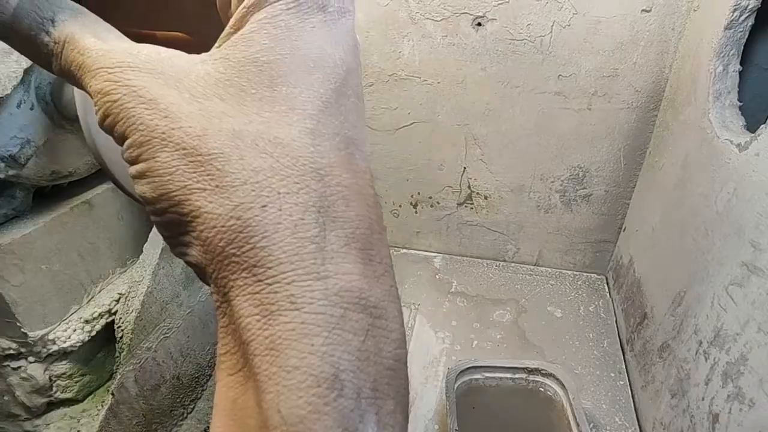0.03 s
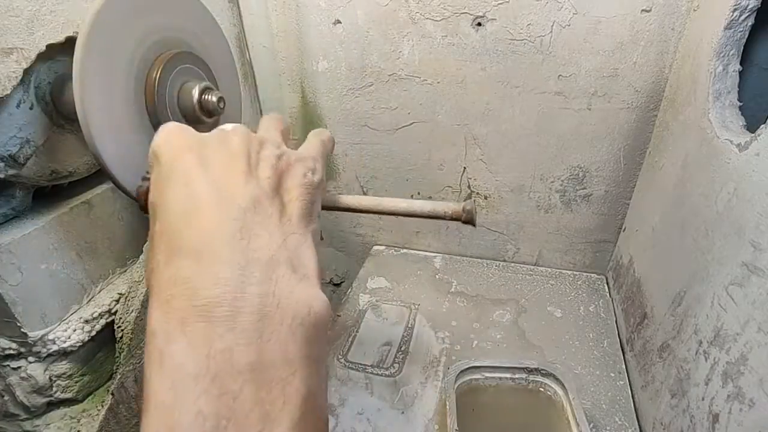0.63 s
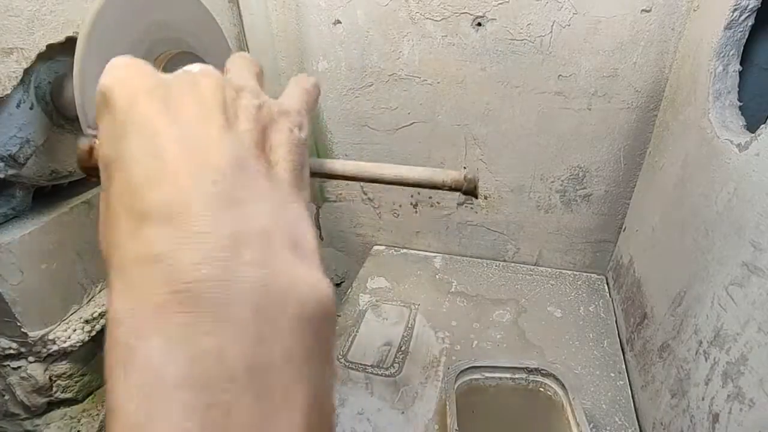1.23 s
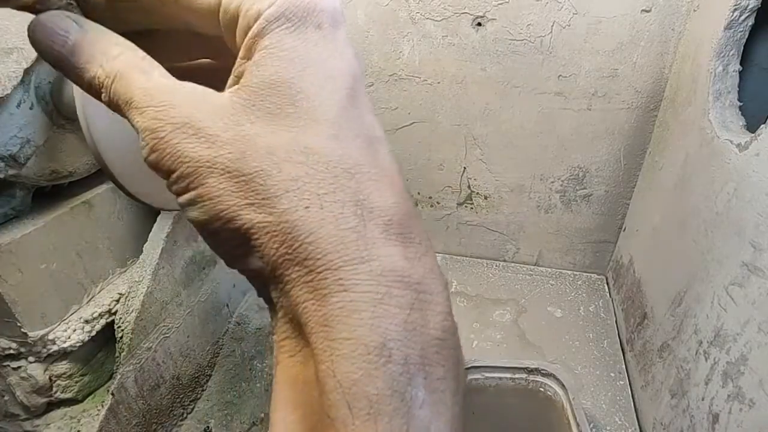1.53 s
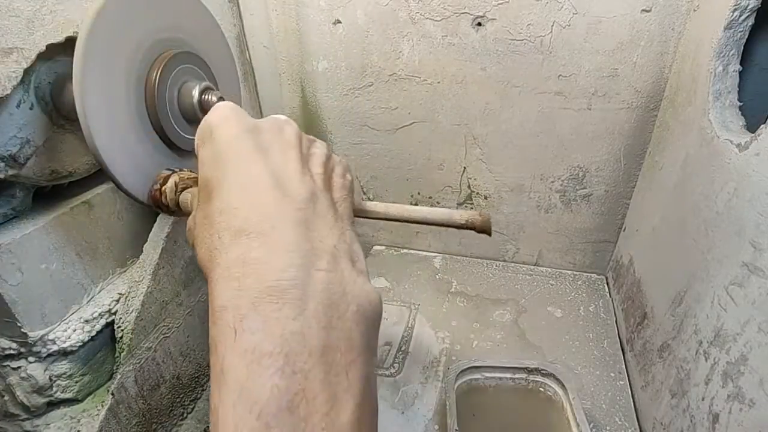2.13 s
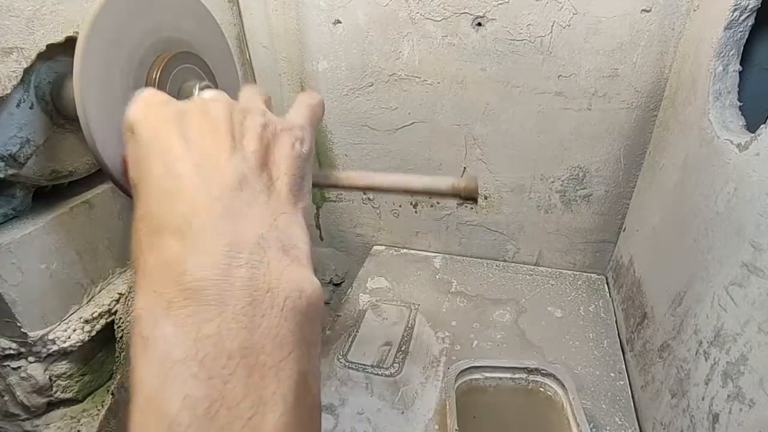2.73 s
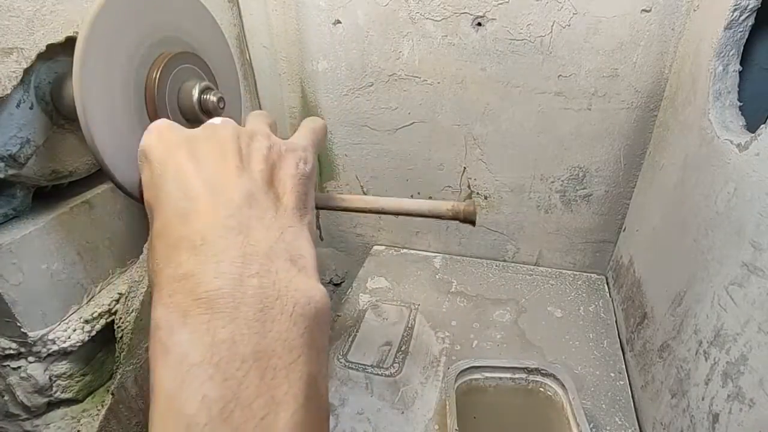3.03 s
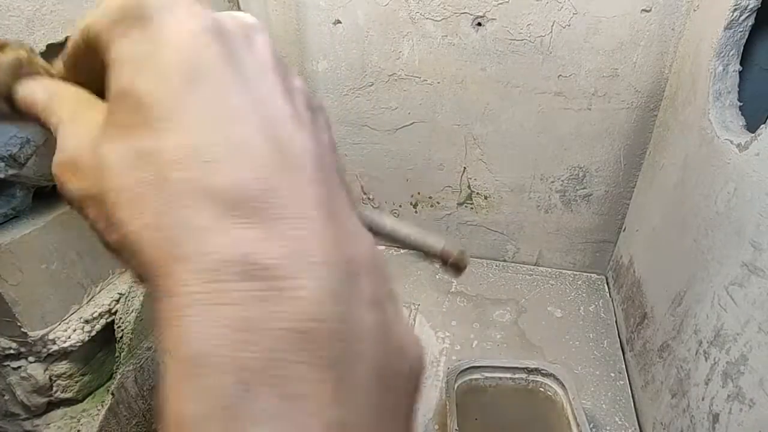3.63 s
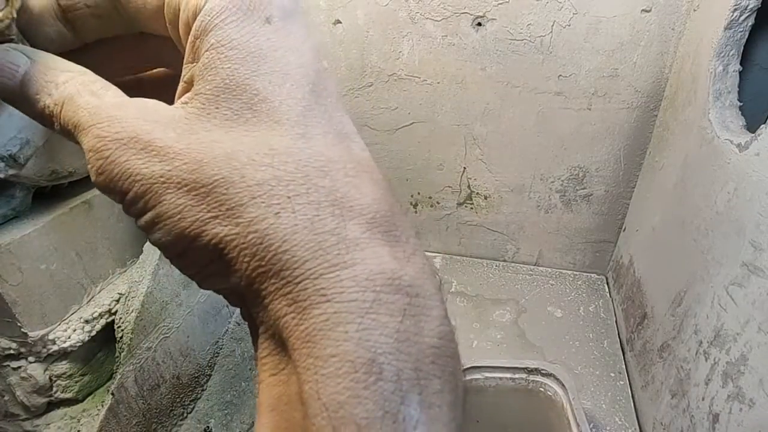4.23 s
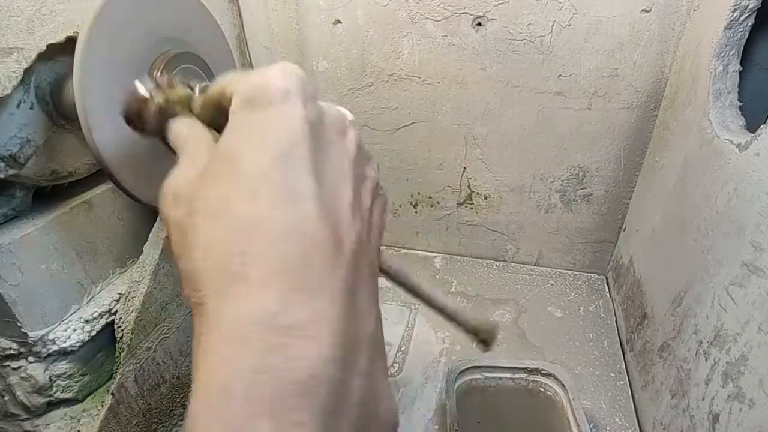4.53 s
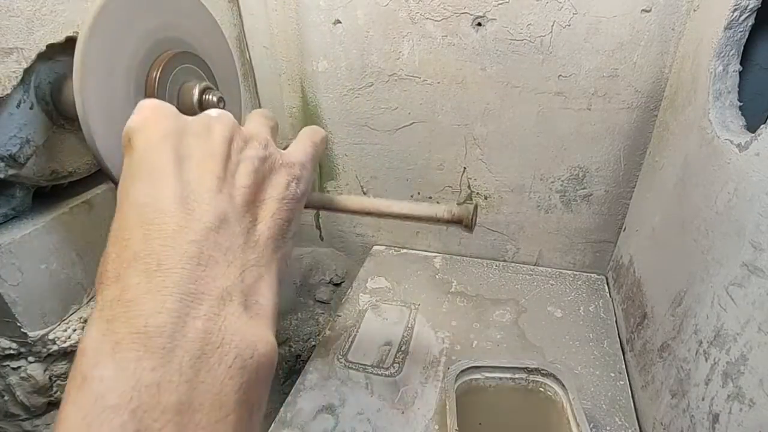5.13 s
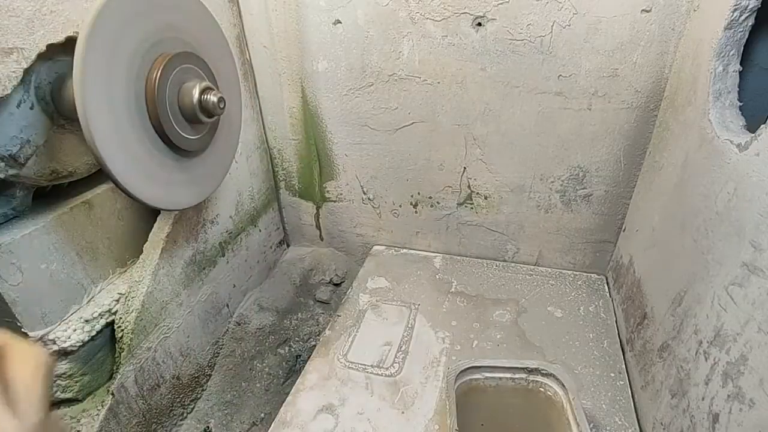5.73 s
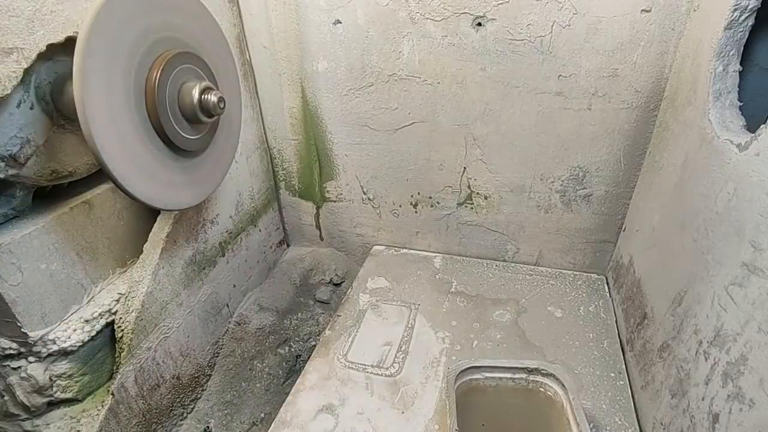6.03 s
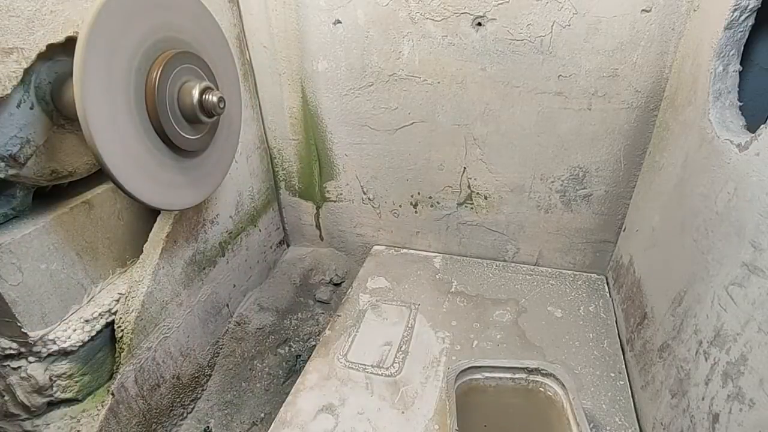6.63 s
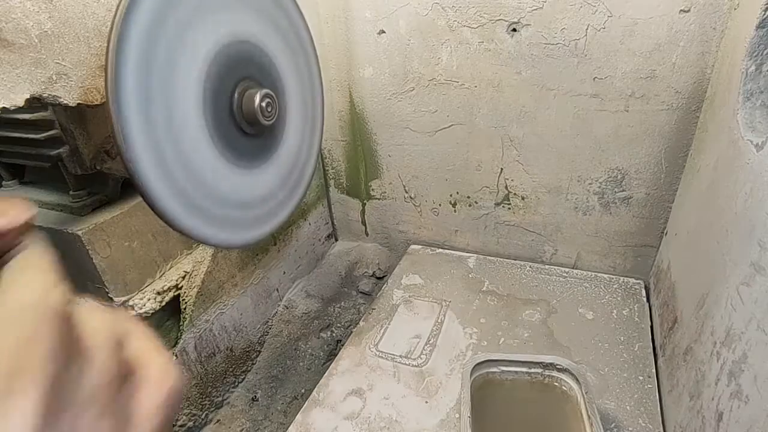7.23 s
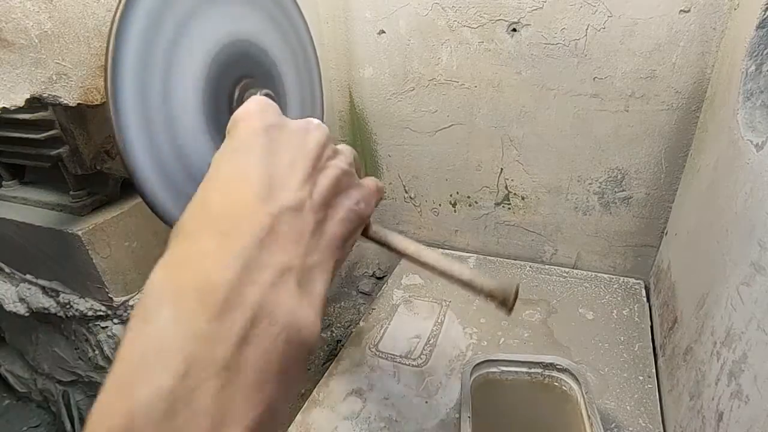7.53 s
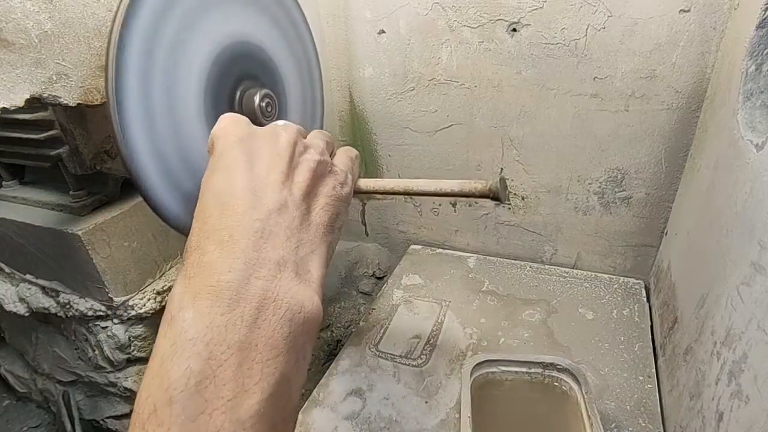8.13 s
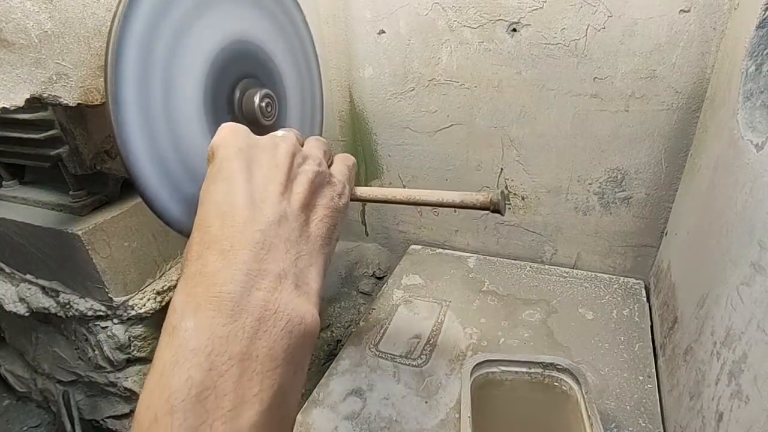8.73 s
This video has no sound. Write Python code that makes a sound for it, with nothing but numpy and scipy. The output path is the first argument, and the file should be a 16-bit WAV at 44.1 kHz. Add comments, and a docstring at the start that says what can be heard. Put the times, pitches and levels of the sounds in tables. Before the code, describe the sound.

A stone grinds with a loud, ringing hiss against a spinning wheel over a steady motor hum, then rasps more gently on a second wheel.

```python
"""A stone on a holding stick is ground against a motor-driven wheel in a splash hood, heard close by.
First the motor hums and shakes its frame. At 0.8, 2.5 and 5.1 s the stone is pressed on firmly: grit
chips it with a hiss, stone and wheel ring, and a limiter turns the hum down under each press.
Near 7 s the sound breaks off, then fades back in with a second, smoother wheel and a swell of rumble.
At 8 s the stone is eased onto this wheel and grinds with a rough drone for about a second."""
import sys
import numpy as np
from scipy import signal
from scipy.fft import rfft, irfft, next_fast_len
from scipy.io import wavfile
from scipy.ndimage import uniform_filter1d

SR = 44100
rng = np.random.default_rng(int(sys.argv[2]) if len(sys.argv) > 2 else 0)


def bounce(signal):
    """Save signal as a 16-bit WAV file at the path given by the first command-line argument."""
    frames = np.transpose(np.atleast_2d(signal))
    limited = np.clip(frames, -1, 1)
    pcm = np.round(limited * 32767).astype(np.int16)
    wavfile.write(sys.argv[1], SR, pcm)


N = 395577
TIME = np.arange(N) / SR
TURN_HZ = 49.73   # turns of the shaft per second
BREAK_S, RESUME_S = 6.941, 6.971   # the short gap for the change of wheel


# firm presses: touch t/s, held for t/s, relative level/dB, hand there early by t/s, starts softer by/dB
PRESSES = [(.790, 0.653, -9, .9, 5.5), (2.469, 1.2485, -9.5, 0.57, 7), (5.062, 0.405, -10.5, 0.85, 3.5)]
# hiss of stone chipping on the first wheel: f/Hz, relative level/dB
FIRST_HISS = [(600, -27), (1000, -11), (1250, -8.5), (2050, -6), (2600, -11.5), (3350, -5), (3900, -1.5),
              (4600, -2), (5500, -3.5), (6200, -7.5), (6600, -1), (8000, -2), (8800, -2), (9350, -13),
              (9900, -3), (10800, -7), (11800, -4.5), (12400, -4.5), (14500, -19), (15600, -8)]
# notes the first wheel rings at: f/Hz, width/Hz, relative level/dB
FIRST_NOTES = [(1160, 57, -6), (1305, 98, -4), (2820, 38, 3), (2890, 38, 10), (3390, 60, -0.5),
               (4470, 61, 2), (4670, 74, 1), (5350, 67, 3.5), (6630, 93, 3), (7050, 36, 7), (7280, 160, 6),
               (7580, 130, 7), (10900, 65, -12), (11270, 68, 9), (11310, 50, 9), (11560, 41, 10.5),
               (11616, 62, 9.5), (15020, 43, 2.5), (15000, 70, -10), (15410, 80, -1)]

def first_wheel_grinding(angle):
    """Three firm presses make the stone hiss and screech and the first wheel ring."""
    press = pressure(PRESSES, settle_s=0.078, lift_s=0.036)
    return grind(angle, press, FIRST_HISS, FIRST_NOTES, buzz=0.11, screech_share=0.64,
                 wobble_db=-0.4, ripple_db=0.8, chatter_db=1.0, wander=0.0014, uneven_db=1.5)


# hiss of stone chipping on the second wheel: f/Hz, relative level/dB
SECOND_HISS = [(350, -35), (700, -5.5), (950, -3.5), (1300, 4), (1580, 1), (1800, -11), (2450, -10),
               (3000, -8), (3500, -1.5), (5200, -3.5), (6800, 1), (7150, -9), (8000, 5), (8900, 5.5),
               (10500, -3.5), (11200, 6), (12100, 6), (12900, 0), (14400, -1), (16000, -6)]
# notes the second wheel rings at: f/Hz, width/Hz, relative level/dB
SECOND_NOTES = [(1070, 45, 5), (1340, 29, -1), (1550, 52, 4), (3510, 62, -1), (4700, 90, -2),
                (6770, 160, 2), (8140, 111, 1), (8440, 110, 4), (8920, 120, 3), (9860, 110, 5),
                (11100, 90, 1), (11800, 150, 8)]

def second_wheel_grinding(angle, press):
    """On the smoother wheel the stone buzzes more and screeches less."""
    return grind(angle, press, SECOND_HISS, SECOND_NOTES, buzz=1.23, screech_share=0.41,
                 wobble_db=-1.1, ripple_db=-0.8, chatter_db=0.5, wander=0.0015, uneven_db=2.5)


# gentle touches: touch t/s, held for t/s, relative level/dB, starts softer by/dB
GENTLE_TOUCHES = [(7.998, 0.017, -15.5, 11.5), (8.05, 0.902, -18, 6)]

def gentle_pressure():
    """The stone brushes the second wheel, then leans in slowly and skips off."""
    return pressure(GENTLE_TOUCHES, settle_s=0.14, lift_s=0.023)


def pressure(touches, settle_s, lift_s):
    """How hard the stone pushes: each touch bites below full strength, settles, holds and lifts off."""
    total = 1e-6
    for touch, held, db, *_, softer_db in touches:
        since = np.maximum(TIME - touch, 0)
        strength = from_db(db - softer_db * np.exp(-since / settle_s))
        release = np.exp(-(np.maximum(since - held, 0) / lift_s) ** 2)
        total = total + (since > 0) * strength * release
    return total


def grind(angle, press, hiss, notes, buzz, screech_share, wobble_db, ripple_db, chatter_db,
          wander, uneven_db):
    """Tiny blows of grit hiss, make the stone screech and set the wheel ringing."""
    blows = grit_blows(angle, buzz)
    # the rim wobbles once a turn and is worn into six ripples
    rim_db = wobble_db * np.sin(angle) + ripple_db * np.sin(6 * angle)
    force = press * from_db(rim_db + chatter_db * drift(110))
    touching = press > 1e-4
    ringing = wheel_ringing(blows, touching, notes, wander, uneven_db)
    scrape = np.sqrt(1 - screech_share) * blows + np.sqrt(screech_share) * stone_screech(touching)
    rasp = hood_echoes(colour(scrape, hiss), strength=1.6, fade_ms=4.5, wander_rate=12)
    sound = force * (rasp + ringing)
    return sound * rms(force * blows) / rms(sound)


def grit_blows(angle, buzz, grains=887):
    """Fresh chipping is random, while the same grains coming round on every turn give a buzz."""
    chipping = stereo_noise()
    grain_at_stone = (angle / (2 * np.pi) * grains).astype(int) % grains
    repeating = rng.standard_normal(grains)[grain_at_stone]
    grit = (chipping + buzz * repeating) / np.sqrt(1 + buzz ** 2)
    blow_db = 3 * rng.standard_normal(N // 16 + 1).repeat(16)[:N]   # a new strength every 16 samples
    return grit * from_db(blow_db)


def stone_screech(touching, life_s=0.07, width_hz=18, range_db=6):
    """The rolling stone rings in short notes, each with a new pitch, strength and left-right place."""
    band_starts_hz, band_hz = np.linspace(1500, 15200, 36, retstep=True)
    times, rings = TIME[touching], 0
    for low_hz in band_starts_hz:
        age = times / life_s + rng.random()   # each whole number starts a new note
        pitch, size, place = rng.random((3, 512))[:, age.astype(int) % 512]
        jitter = np.sqrt(2 * np.pi * width_hz / SR) * rng.standard_normal(len(times))
        phase = np.cumsum(2 * np.pi * (low_hz + band_hz * pitch) / SR + jitter) % (2 * np.pi)
        pair = np.sin(np.array([phase, phase + 2 * np.pi * place], np.float32))
        rings = rings + from_db(range_db * size) * np.sin(np.pi * age) * pair
    out = np.zeros((2, N))
    out[:, touching] = rings / rms(rings)
    return out


def wheel_ringing(blows, touching, notes, wander, uneven_db):
    """Rubbing keeps the wheel singing; the moving contact shifts each note's pitch, level and place."""
    times, feed, total = TIME[touching], blows[0, touching], 0
    for hz, width, db in notes:
        pitch_hz = hz * (1 + wander * drift(14, times))
        phase = (2 * np.pi * (np.cumsum(pitch_hz) / SR % 1)).astype(np.float32)
        wave = np.array([np.cos(phase), np.sin(phase)])
        # smoothing twice keeps only the part of the blows that is close to this pitch
        keep = np.exp(-np.pi * width / np.sqrt(np.sqrt(2) - 1) / SR)
        swing = signal.lfilter([(1 - keep) ** 2], [1, -2 * keep, keep * keep], feed * wave)
        swing = hold_steady(swing, power=(swing ** 2).sum(axis=0))
        right_phase = phase + (2.1 * drift(22, times)).astype(np.float32)
        left = (swing * wave).sum(axis=0)
        right = swing[0] * np.cos(right_phase) + swing[1] * np.sin(right_phase)
        gain = np.sqrt(2 * np.pi * width / SR) * from_db(db + uneven_db * drift(18, times))
        total = total + gain * np.array([left, right])
    bass_cut = signal.butter(2, 600, "high", fs=SR, output="sos")
    out = np.zeros((2, N))
    out[:, touching] = signal.sosfilt(bass_cut, total)
    return out


# notes of the first wheel as it bends: f/Hz, width/Hz, relative level/dB
BENDING_NOTES = [(1471, 4, 22.5), (1516, 5.1, 17.5), (1320, 68, -15)]
# how they swell and ebb, one list for each press: t/s, relative level/dB
BENDING_SWELLS = [
    [(0.79, -47), (0.97, -25), (1.028, -40), (1.126, -37), (1.172, -24.5), (1.272, -44), (1.29, -33),
     (1.452, -32.5), (1.62, -63.5)],
    [(2.47, -57), (2.586, -31), (2.732, -29), (2.808, -39), (2.906, -29), (3.196, -34), (3.276, -42),
     (3.766, -28), (3.92, -64)],
    [(5.06, -58), (5.198, -39), (5.222, -27), (5.458, -36), (5.502, -29), (5.57, -45), (5.598, -53),
     (5.646, -54), (5.66, -57)],
]

def wheel_bending(on_second):
    """The first wheel sings softly when free; under the stone, rubbing steadies it and it swells."""
    idle = from_db(-47.5 + 4.5 * hand_near()) * ~on_second
    rubbed = 0
    for swell in BENDING_SWELLS:
        swell_db = np.interp(TIME, *np.transpose(swell), left=-np.inf, right=-np.inf)
        rubbed = rubbed + from_db(9.5 + swell_db)
    ring = resonate(stereo_noise(), BENDING_NOTES)
    steady = hold_steady(ring, power=np.mean(ring ** 2, axis=0))
    return idle * ring / rms(ring) + rubbed * steady


# tones of the second wheel under the stone: multiple of the turning rate, relative level/dB
DRONE_TONES = [(21, -4), (22, -4), (24, 2), (25, 1), (27, -4), (30, 6), (31, 2), (32, 6)]

def wheel_drone(angle, press):
    """The second wheel drones roughly, louder the harder the stone pushes."""
    return from_db(-24) * press * shaft_tones(angle, DRONE_TONES, waver_db=2, waver_rate=20)


# tones of the motor: multiple of the turning rate, relative level/dB
HUM_TONES = [(2, -7), (3, -9.5), (4, -34), (6, -10.5), (8, -17.5), (10, -19.5), (12, 0.5), (14, -18.5),
             (16, -24), (18, -10.5)]

def motor_hum(angle, left_lag_ms=0.041):
    """The motor hums in step with its shaft; it stands to one side, so the left hears it later."""
    lag_angle = 2 * np.pi * TURN_HZ * left_lag_ms / 1000
    angles = np.array([angle - lag_angle, angle])
    return from_db(-28.5) * shaft_tones(angles, HUM_TONES, waver_db=0.9, waver_rate=13)


def motor_sag(on_second, drop_db=1):
    """A gain that makes the motor a little softer from the last firm press until the wheel change."""
    touch, held, *_ = PRESSES[-1]
    return from_db(-drop_db * ramp(touch + held, length_s=0.88) * ~on_second)


# low notes of the frame: f/Hz, width/Hz, relative level/dB
FRAME_NOTES = [(103, 11, -28), (139, 15, 5), (158.3, 13.4, 5), (298.4, 28.4, 5)]

def frame_rumble():
    """The motor shakes its frame, which rumbles at a few low notes."""
    shaking = resonate(stereo_noise(), FRAME_NOTES)
    return at_level(colour(shaking, [(50, -20), (90, -0.5), (330, -2.5), (700, -21)]), db=-31.5)


# noise of air and bearings: f/Hz, relative level/dB
AIR_NOISE = [(30, -10), (65, -7), (110, -23), (230, 4.5), (350, 4.5), (500, 2), (720, 6), (950, -2.5),
             (1400, 0.5), (1800, -16), (2600, -13), (6000, -63)]

def air_rush():
    """Stirred air and turning bearings make a steady rush."""
    return at_level(colour(stereo_noise(), AIR_NOISE), db=-33)


# swish of each wheel's rim: f/Hz, relative level/dB
FIRST_SWISH = [(900, -20), (1300, 1), (1750, -2.5), (2400, -0.5), (2950, 3.5), (3800, -3.5), (4450, -3.5),
               (5200, -10), (7700, -8), (8600, -2), (9700, -13.5), (11200, -14), (11700, -2.5),
               (12400, -15.5), (16000, -18)]
SECOND_SWISH = [(900, -17), (1200, 6), (1550, 9.5), (1750, -1), (2450, -4.5), (2700, 0.5), (3450, 4),
                (3900, -5.5), (4700, -4), (5050, -9), (6800, -3.5), (7200, -16), (8200, -1.5), (9100, -6),
                (9700, -13), (11100, -10), (11700, -4), (12600, -9), (16000, -20)]

def rim_swish(angle, on_second, left_lag_ms=0.24):
    """Each rim swishes and throbs a little on every turn; the first is louder with the hand near."""
    left, right = stereo_noise()
    late_left = np.interp(TIME - left_lag_ms / 1000, TIME, left)   # the rim lies off to one side
    rim = hood_echoes(np.array([late_left, right]), strength=0.7, fade_ms=7, wander_rate=14)
    throb_db = 0.41 * np.sin(angle)
    first = at_level(colour(rim, FIRST_SWISH), db=-35.5 + 2 * hand_near() + throb_db)
    second = at_level(colour(rim, SECOND_SWISH), db=-31 + throb_db)
    return np.where(on_second, second, first)


def whine(angle, step_s=5):
    """A thin whine at twenty times the turning rate steps up in level about halfway through."""
    tone = shaft_tones(angle, [(20, 0)], waver_db=1, waver_rate=23)
    return at_level(tone, db=np.where(TIME < step_s, -51, -43.5))


# the hollow note heard with the second wheel: f/Hz, width/Hz, relative level/dB
HOWL_NOTE = [(707, 28, 0)]

def howl(on_second):
    """A soft, hollow howl comes with the second wheel."""
    return on_second * at_level(resonate(rng.standard_normal(N), HOWL_NOTE), db=-45)


# deep rumble of the stand: f/Hz, relative level/dB
STAND_RUMBLE = [(20, -29), (52, -30), (76, 1), (92, -1), (125, -3), (300, -36)]

def stand_rumble(swell_at_s=7.3, swell_width_s=0.31):
    """The stand rumbles faintly and swells once after the change of wheel."""
    deep = colour(rng.standard_normal(N), STAND_RUMBLE)
    swell = np.exp(-((TIME - swell_at_s) / swell_width_s) ** 2)
    return at_level(deep, db=-54) + swell * at_level(deep, db=-37)


def hood_echoes(x, strength, fade_ms, wander_rate):
    """Echoes off the close hood boost some pitches and weaken others, shifting as the hand moves."""
    ms = np.arange(2048) * 1000 / SR
    weights = np.array([drift(wander_rate) for _ in range(3)])
    out = x
    for weight in weights / np.linalg.norm(weights, axis=0):
        walls = rfft(rng.standard_normal((2, len(ms))) * np.exp(-ms / fade_ms))
        walls /= np.sqrt(uniform_filter1d(np.abs(walls) ** 2, size=17))   # keep only fine ripples
        echoes = irfft(walls)[:, :len(ms) // 2]
        out = out + strength * weight * signal.oaconvolve(x, echoes, axes=1)[:, :N]
    return out * rms(x) / rms(out)


# how alike left and right are: f/Hz, likeness from 0 to 1
LIKENESS = [(25, .85), (80, 1), (150, 1), (350, 0.79), (900, 0), (1800, 0.93), (8000, 0.37)]

def stereo_noise():
    """White noise for two ears: alike in the bass, scattered by the hood in the treble."""
    shared, apart = rng.standard_normal((2, N))
    mid = shape(shared, lambda hz: np.sqrt(1 + at_hz(LIKENESS, hz)))
    side = shape(apart, lambda hz: np.sqrt(1 - at_hz(LIKENESS, hz)))
    return np.array([mid + side, mid - side]) / np.sqrt(2)


def hand_near(move_s=0.13):
    """Goes from 0 to 1 as the hand comes up for a firm press, and back as it lifts."""
    return sum(ramp(touch - early, move_s) - ramp(touch + held, move_s)
               for touch, held, _, early, _ in PRESSES)


def shaft_tones(angle, tones, waver_db, waver_rate):
    """Tones locked to the turning shaft, each wavering in level on its own."""
    total = 0
    for multiple, db in tones:
        gain = np.sqrt(2) * from_db(db + waver_db * drift(waver_rate))
        total = total + gain * np.sin(multiple * angle + rng.uniform(0, 2 * np.pi))
    return total


def hold_steady(x, power, window_s=0.031):
    """Even out a ringing note's level, as steady rubbing does."""
    return x / np.sqrt(uniform_filter1d(power, int(window_s * SR)) + 1e-12)


def resonate(x, notes):
    """Let a sound ring at each note of (f/Hz, width/Hz, level/dB)."""
    out = 0
    for hz, width, db in notes:
        keep = np.exp(-np.pi * width / SR)
        feedback = [1, -2 * keep * np.cos(2 * np.pi * hz / SR), keep * keep]
        gain = (1 - keep * keep) / 2
        out = out + from_db(db) * signal.lfilter([gain, 0, -gain], feedback, x)
    return out


def colour(x, spectrum):
    """Make pitches louder or softer by a table of (f/Hz, level/dB)."""
    return shape(x, lambda hz: from_db(at_hz(spectrum, hz)))


def shape(x, gain_at):
    """Multiply each frequency in a sound by gain_at(hz)."""
    size = next_fast_len(N + SR // 20)
    hz = np.maximum(np.arange(size // 2 + 1) * SR / size, 1)
    return irfft(rfft(x, size) * gain_at(hz), size)[..., :N]


def at_hz(points, hz):
    """Read between rows of (f/Hz, value), giving every octave equal room."""
    frequencies, values = np.transpose(points)
    return np.interp(np.log(hz), np.log(frequencies), values)


def drift(rate, times=TIME):
    """A random wander of typical size 1 that changes course `rate` times a second."""
    points = rng.standard_normal(4000)
    return np.interp(times * rate, np.arange(len(points)), points) * np.sqrt(3 / 2)


def ramp(start_s, length_s):
    """Rise evenly from 0 to 1."""
    return np.clip((TIME - start_s) / length_s, 0, 1)


def at_level(x, db):
    """Bring a steady sound to an average level."""
    return from_db(db) * x / rms(x)


def rms(x):
    """The average size of a signal (root mean square)."""
    return np.sqrt(np.mean(x ** 2) + 1e-20)


def from_db(db):
    """Turn decibels into a gain to multiply by."""
    return 10 ** (np.asarray(db) / 20)


def scene():
    """The shaft turns almost evenly and sets the pace; the stone grinds over the running machine."""
    angle = 2 * np.pi * np.cumsum(TURN_HZ * (1 + 0.00088 * drift(5))) / SR
    on_second = TIME > BREAK_S   # true once the second wheel is on
    eased = gentle_pressure()
    grinding = from_db(2) * (first_wheel_grinding(angle) + second_wheel_grinding(angle, eased))
    drone = wheel_drone(angle, eased)
    hum, thin_whine = motor_hum(angle), whine(angle)
    frame, stand = frame_rumble(), stand_rumble()
    motor = motor_sag(on_second) * (hum + frame + air_rush())
    background = thin_whine + stand + howl(on_second) + rim_swish(angle, on_second)
    return grinding + wheel_bending(on_second) + drone + motor + background


# balance of the two microphones: f/Hz, left minus right level/dB
MIC_BALANCE = [(120, -0.9), (330, 4), (600, 0.9), (1300, 2), (3000, -0.5), (5500, -2.5), (7300, -4),
               (8450, -14), (9500, -5), (10700, 5), (11300, 9.5), (12500, 5), (15000, 2)]

def microphones(x, left_lag_ms):
    """The sound reaches the left microphone later, and each one favours different pitches."""
    def left_share(hz):
        return 1 / (1 + from_db(-2 * at_hz(MIC_BALANCE, hz)))
    def delay(hz):
        return np.exp(-2j * np.pi * hz * left_lag_ms / 1000)
    left = shape(x[0], lambda hz: np.sqrt(2 * left_share(hz)) * delay(hz))
    right = shape(x[1], lambda hz: np.sqrt(2 * (1 - left_share(hz))))
    return np.array([left, right])


def limiter(x, ceiling_db, release_db_per_s, window_s):
    """Anything louder than the ceiling turns the whole sound down; then the level comes back."""
    keep = np.exp(-1 / (window_s * SR))
    power = signal.lfilter([1 - keep], [1, -keep], np.mean(x ** 2, axis=0))
    excess_db = np.maximum(10 * np.log10(power + 1e-12) - ceiling_db, 0)
    recovery_db = release_db_per_s * TIME
    cut_db = np.maximum.accumulate(excess_db + recovery_db) - recovery_db
    return x * from_db(-cut_db)


def break_and_fade(start_gain=0.32):
    """The gain across the change of wheel: a moment of near silence, then an even fade back in."""
    back_in = start_gain + (1 - start_gain) * ramp(RESUME_S, length_s=0.22)
    return np.select([TIME < BREAK_S, TIME < RESUME_S], [1, from_db(-45)], back_in)


def record(dry):
    """Two microphones, a limiter, rounded peaks, the short break and a steep cut of the top treble."""
    picked_up = microphones(dry, left_lag_ms=0.2)
    limited = limiter(picked_up, ceiling_db=-12.5, release_db_per_s=136, window_s=0.0038)
    rounded = limited / (1 + (limited / 0.85) ** 6) ** (1 / 6)
    treble_cut = signal.ellip(8, 0.05, 50, 15600, fs=SR, output="sos")   # above 15600 Hz
    return signal.sosfiltfilt(treble_cut, rounded * break_and_fade())


dry = scene()
out = record(dry)
bounce(out)
```